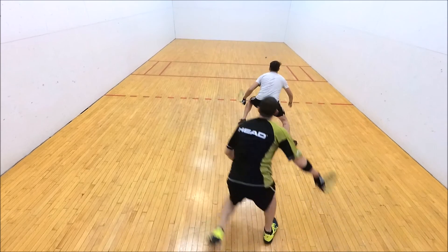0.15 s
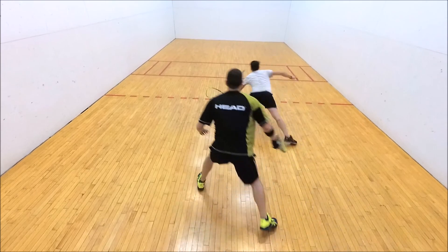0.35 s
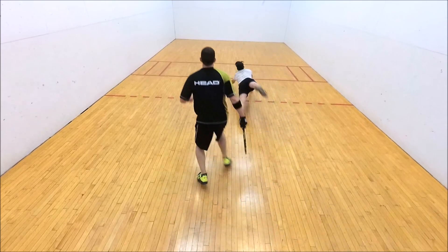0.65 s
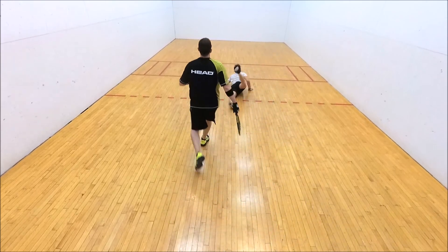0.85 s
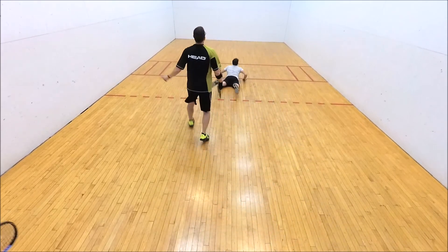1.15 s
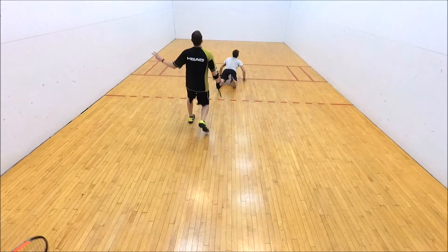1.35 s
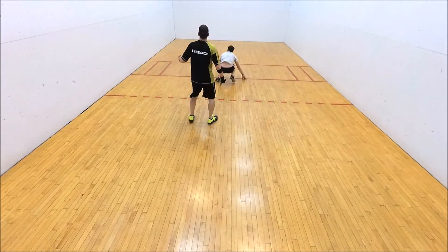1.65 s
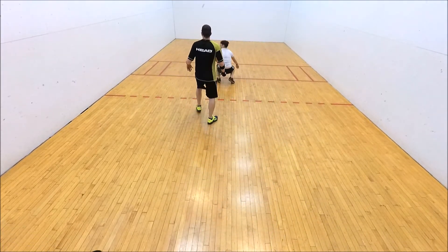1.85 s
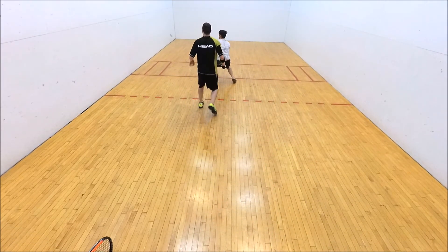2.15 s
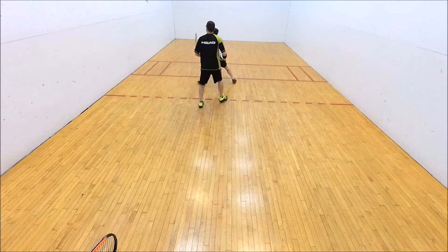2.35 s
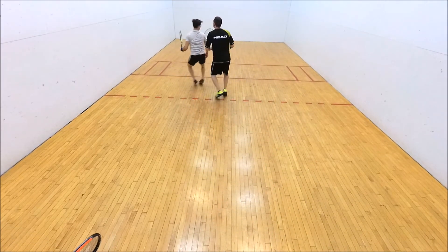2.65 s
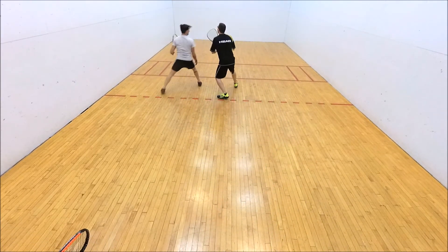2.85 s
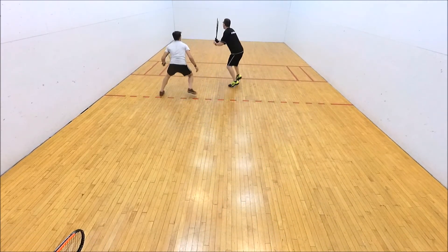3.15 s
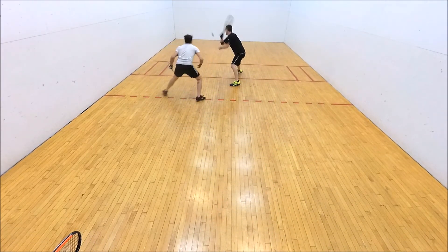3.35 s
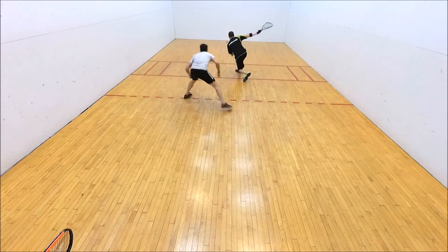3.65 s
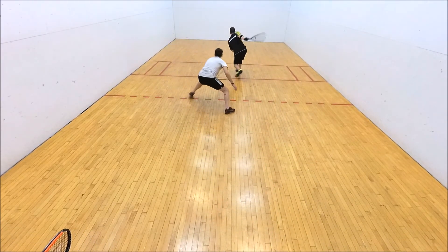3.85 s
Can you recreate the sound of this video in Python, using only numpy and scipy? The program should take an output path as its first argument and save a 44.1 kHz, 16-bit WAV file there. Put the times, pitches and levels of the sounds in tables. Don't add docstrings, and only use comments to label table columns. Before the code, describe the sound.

Racquet and ball impacts ring hollow in a bare court, loud at the start, fading through fainter bounces and footfalls, then a brief shoe squeak and another loud hit; boxy microphone, right side only.

```python
import sys
import numpy as np
from scipy import signal
from scipy.fft import rfft, irfft, next_fast_len
from scipy.io import wavfile
from scipy.ndimage import uniform_filter1d, map_coordinates

SR = 44100
rng = np.random.default_rng(int(sys.argv[2]) if len(sys.argv) > 2 else 0)


def unload_audio(sound):
    columns = np.transpose(np.atleast_2d(sound))
    steps = np.round(np.clip(columns, -1, 1) * 32767)
    wavfile.write(sys.argv[1], SR, steps.astype(np.int16))


def nominal_scale(level):
    x = np.asarray(level, float) / 20
    return 10 ** x


N = 176400


def along(points, hz):
    f, v = np.transpose(points)
    return np.interp(np.log(hz + 1), np.log(f + 1), v)


def closed(points, hz):
    below, above = (points[0][0] / 2, -120), (points[-1][0] * 2, -120)
    return nominal_scale(along([below] + points + [above], hz))


def unit(x):
    return x / np.sqrt(np.mean(x ** 2) + 1e-20)


def filtered(x, response):
    m = next_fast_len(N + SR // 2)
    return irfft(rfft(x, m) * response(np.fft.rfftfreq(m, 1 / SR)), m)[..., :N]


def peak(f, hz, width):
    return 1j * f * width / (hz * hz - f * f + 1j * f * width)


def add(out, x, s):
    k = round(s * SR)
    x = x[max(-k, 0):][:N - max(k, 0)]
    out[max(k, 0):][:len(x)] += x


# (frequency [Hz], T60 [s])
COURT_T60 = [(60, 2.3), (200, 3.7), (500, 2.75), (1500, 2.64), (4000, 2.79), (6000, 1.77), (9000, 1.06),
             (15000, 0.37)]
# (frequency [Hz], time constant [s])
COURT_RISE = [(200, .04), (900, .06), (1500, .035), (3000, .01), (8000, .012)]


def court(colour):
    echoes_per_s, uneven_db, mixed_s = 380, 7, 0.063
    early_db, early_t60_s = -7.5, 1
    t = np.arange(5 * SR // 2) / SR
    lumps = map_coordinates(rng.standard_normal(2000), [np.minimum(t * echoes_per_s, 1990)], order=1)
    echoes = rng.standard_normal(len(t)) * nominal_scale(uneven_db * lumps * np.exp(-t / mixed_s))
    hz, s, z = signal.stft(echoes, SR, nperseg=512, noverlap=384)
    late = nominal_scale(-60 * s / along(COURT_T60, hz)[:, None])
    early = nominal_scale(early_db - 60 * s / early_t60_s)
    rise = 1 - np.exp(-(s + 0.0039) / along(COURT_RISE, hz)[:, None])
    shape = colour(hz)[:, None] * rise * late * (1 + early)
    return signal.istft(z * shape, SR, nperseg=512, noverlap=384)[1][:len(t)]


# (time [s], hollow pock [dB], rubber slap [dB], bright crack [dB], slap tilt [dB per octave])
HITS = [(-.06, -5, -7.5, -21.5, 0.5), (.552, -24, -17.5, -36, 1.5), (0.671, -17, -36, -56.5, 5),
        (.76, -32, -53, -52.5, 6), (.9, -45, -70, -49, -10.5), (1.082, -64, -54, -25, 0),
        (1.33, -47, -25, -33, 1), (1.668, -89, -30, -42, 1.5), (2.134, -33.5, -37, -47, -0.5),
        (2.874, -88, -48.5, -65, -1), (3.3, -60, -44.5, -57, 0.5), (3.571, -9, -28, -34.5, 3),
        (3.588, -7, -31, -48, -4), (3.755, -19, -35.5, -34, 8.5), (3.771, -7.5, -19, -34.5, -2.5)]
# (frequency [Hz], level [dB])
POCK = [(500, -7), (760, -0.5), (900, 5), (1050, 3), (1400, -9.5)]
SLAP = [(100, 2), (250, -4), (330, 9.5), (700, 11), (2000, 6), (4000, -3), (5600, -6), (7500, -25.5)]
CRACK = [(4000, -10), (7000, -10.5), (8500, -5.5), (12000, -3.5), (15500, 3)]
# (time [s], level [dB], frequency [Hz], width [Hz])
RINGS = [(0.555, -6, 1310, 297), (.64, -24, 5000, 1000), (1.083, -24, 5440, 500), (1.322, -15, 3900, 350),
         (1.665, -35.5, 3970, 300), (1.332, -19, 5260, 590), (1.67, -26, 2190, 300),
         (2.135, -11.5, 994, 160), (2.88, -17, 650, 90), (3.478, -37, 1510, 504), (3.772, -24, 3500, 303)]


def ball():
    bass_cut_hz = 80
    out = np.zeros(N)
    for s, pock_db, slap_db, crack_db, tilt_db in HITS:
        def contact(hz):
            pock = nominal_scale(pock_db) * closed(POCK, hz)
            slap = nominal_scale(slap_db + tilt_db * np.log2((hz + 1) / 2000)) * closed(SLAP, hz)
            return pock + slap + nominal_scale(crack_db) * closed(CRACK, hz)
        add(out, court(contact), s)
    for s, db, ring_hz, width in RINGS:
        ring = court(lambda hz: nominal_scale(db) * np.abs(peak(hz, ring_hz, width)) ** 2)
        add(out, ring, s)
    return filtered(out, lambda f: (1j * f / (bass_cut_hz + 1j * f)) ** 2)


# (frequency [Hz], level [dB])
AIR = [(40, -38), (85, -16.5), (120, -6.5), (400, -10.5), (620, -4.5), (2500, -16.5), (5000, -27.5),
       (7000, -37), (15000, -29.5)]


def murmur():
    return nominal_scale(-46.5) * unit(filtered(rng.standard_normal(N), lambda f: closed(AIR, f)))


# (frequency [Hz], width [Hz], level [dB])
HOUSING = [(896.6, 68, 11), (1050, 37, 6.5), (1427, 150, 5.5), (1732, 53, 7), (2379, 167, 10),
           (2860, 80, 3.5), (3303, 200, 9), (3940, 244, 5.5), (4690, 190, 5), (5860, 1400, 1.5),
           (8700, 680, 7), (11080, 350, 8), (12700, 630, 0.5), (14400, 900, 1)]
# (frequency [Hz], width [Hz], level [dB])
NOTCHES = [(1026, 70, -8.5), (1193, 46, -10.5), (2664, 65, -9.5), (2963, 124, -7.5), (4210, 74, -4),
           (5880, 260, -5)]


def housing(x):
    leak_db = -4
    f = np.fft.rfftfreq(4096, 1 / SR)
    power = nominal_scale(2 * leak_db) + sum(nominal_scale(2 * db) * np.abs(peak(f, c, w)) ** 2 for c, w, db in HOUSING)
    dips = nominal_scale(sum(db * np.exp(-((f - c) / w) ** 2) for c, w, db in NOTCHES))
    cep = irfft(np.log(np.sqrt(power) * dips))
    cep[1:2048] *= 2
    cep[2049:] = 0
    return signal.fftconvolve(x, irfft(np.exp(rfft(cep))))[:N]


# (frequency [Hz], level [dB])
HISS = [(30, 9), (60, -36), (200, -4), (600, -4.5), (3000, -4.5), (7000, -8.5), (15000, -10)]
# (frequency [Hz], level [dB])
HUM = [(120, -91), (180, -92), (240, -86), (300, -91), (360, -90), (420, -88), (540, -87), (660, -87),
       (780, -87), (900, -89)]
# (frequency [Hz], width [Hz], level [dB])
WHINE = [(9910, 1000, -62), (13100, 400, -71)]


def circuit():
    hiss_db = (-62, -56.5)
    tick_s, tick_db, tick_t60_s = .1598, -38, .005
    t = np.arange(N) / SR
    hiss = [nominal_scale(db) * unit(filtered(rng.standard_normal(N), lambda f: closed(HISS, f))) for db in hiss_db]
    hum = sum(nominal_scale(db) * np.sin(2 * np.pi * (hz * t + rng.random())) for hz, db in HUM)
    tick = nominal_scale(tick_db - 60 * ((t - tick_s) % 1) / tick_t60_s) * rng.standard_normal(N)
    whine = np.zeros(N)
    for hz, width, db in WHINE:
        whine += nominal_scale(db) * unit(filtered(rng.standard_normal(N), lambda f: peak(f, hz, width) ** 2))
    return np.array([hiss[0] + hum + tick, hiss[1] + whine])


# (time [s], level [dB], floor note [Hz], T60 [s])
STEPS = [(.0, -19.5, 88, 0.25), (.03, -34, 55, 0.2), (.45, -54, 86, .6), (.76, -33, 165, 0.51),
         (0.788, -22.5, 87, 0.26), (0.931, -41, 93.3, 0.52), (1.08, -42, 159.6, 0.81),
         (1.21, -47, 84.3, 0.7), (1.372, -23.5, 157, 0.15), (1.76, -34, 87.6, 0.18), (1.879, -37, 95, 0.27),
         (2.15, -41.5, 176, 0.3), (2.419, -49, 88, 0.69), (2.5, -49, 157.4, 0.42), (2.864, -24, 673, 0.18),
         (2.93, -53, 92.5, 1), (3.269, -46, 89.5, 0.19), (3.302, -24.5, 668, 0.16),
         (1.328, -34.5, 289, 0.39), (2.134, -40, 230.2, 0.4), (3.78, -23, 250, 0.39), (.73, -29, 202, 0.23),
         (3.771, -27, 163.2, 0.66), (3.79, -32.5, 83.3, 0.93)]


def steps():
    rise_s, mode_ratio, mode_scatter, room_db = .04, 1.04, .8, -20
    out, t = np.zeros(N), np.arange(SR) / SR
    for (s, db, hz, t60), chance in zip(STEPS, rng.random((len(STEPS), 3))):
        modes = hz * mode_ratio ** (np.array([-1, 0, 1]) + mode_scatter * (chance - .5))
        note = np.array([.5, 1, .5]) @ np.sin(2 * np.pi * modes[:, None] * t)
        onset = (1 - np.exp(-t * np.sqrt(hz / 90) / rise_s)) ** 2
        add(out, nominal_scale(db - 60 * t / t60) * onset * note, s)
    tail = court(lambda hz: closed([(60, 0.015), (1000, 0)], hz))
    return out + nominal_scale(room_db) * signal.fftconvolve(out, tail / np.linalg.norm(tail))[:N]


# (time [s], level [dB], length [s])
SWELLS = [(0.028, 2, 0.01), (0.042, -1, 0.006), (0.124, -3.5, 0.011), (0.161, -5, .007),
          (0.214, -4.5, 0.0053), (0.233, -3.5, 0.0048), (0.259, -10, 0.0051), (0.315, -9, 0.0075),
          (.329, -11, .006), (0.357, -9.5, 0.0047), (0.449, -12, 0.0066), (0.474, -9.5, 0.004),
          (0.484, -14, 0.005), (.588, -6.5, 0.0034), (0.636, -9, 0.0044), (0.736, -11, 0.0036),
          (0.755, -14.5, 0.01), (.78, -9, 0.0074), (0.882, -16, 0.0087), (0.979, -18.5, .007),
          (1.108, -21, 0.01), (1.239, -24, 0.016), (1.354, -21, .007), (1.41, -20.5, 0.0056),
          (1.436, -27, 0.017), (1.743, -23, 0.0077), (2.17, -26, 0.0043), (2.191, -21, 0.0033),
          (2.204, -16, 0.0064), (2.231, -23, 0.0045), (2.249, -20.5, 0.0055), (2.278, -26, 0.0055),
          (2.303, -22, 0.0061), (2.309, -21.5, 0.0068), (2.343, -25, 0.0096), (2.378, -25, 0.01),
          (2.406, -24, 0.0033), (2.455, -26, 0.0095), (2.508, -30.5, .009), (2.555, -27.5, 0.0091),
          (2.696, -32.5, 0.0084), (2.813, -34, 0.0093), (3.617, -5.5, 0.0063), (3.635, -4.5, 0.0049),
          (3.645, -2, 0.0076), (3.682, -9, 0.0044), (3.72, -9.5, 0.0066), (3.808, -3, 0.01),
          (3.825, -1.5, 0.0076), (3.844, 1.5, 0.0018), (3.857, -4, 0.0073), (3.87, -1, 0.0027),
          (3.893, -4, 0.0023), (3.916, -9.5, 0.0091), (3.944, -10, 0.0077), (3.981, -6.5, 0.0069)]


def swells(wash):
    main_hz, scatter, band_hz = 914.2, 0.023, 97
    reach = 0.79
    tones, share, t = np.zeros(N), np.zeros(N), np.arange(-2000, 2000) / SR
    for (s, db, length), (turn, detune) in zip(SWELLS, rng.random((len(SWELLS), 2))):
        hz = main_hz * (1 + scatter * (2 * detune - 1))
        tone = np.sin(2 * np.pi * (hz * t + turn))
        add(tones, nominal_scale(db) * np.exp(-(t / length) ** 2) * tone, s + t[0])
        add(share, np.exp(-(t / length / reach) ** 2), s + t[0])
    note = filtered(wash, lambda f: np.exp(-((f - main_hz) / band_hz) ** 2))
    return wash - np.minimum(share, 1) * note + tones


# (time [s], slap [dB], crack [dB], length [s])
CLAPS = [(0.564, -35, -46, 0.0038), (0.594, -37, -48, 0.0022), (0.67, -18, -51, 0.0036),
         (0.709, -21, -59, .012), (1.087, -38, -17, 0.002), (1.107, -29, -16, 0.002),
         (1.15, -32.5, -27, .004), (1.336, -23, -49, 0.0031), (1.351, -49.5, -36, 0.00087),
         (1.367, -29, -43, 0.0015), (1.698, -44.5, -38, 0.0023), (3.855, -21.5, -34.5, 0.0035),
         (3.886, -19, -47, 0.0034), (2.137, -47, -56, 0.0044), (3.779, -13, -31, 0.0033),
         (3.787, -14.5, -48, 0.0019), (0.052, -14, -43, 0.0034), (0.123, -13, -50, 0.0047)]


def wall_claps():
    claps, t = np.zeros((2, N)), np.arange(-2000, 2000) / SR
    for s, slap_db, crack_db, length in CLAPS:
        burst = np.exp(-(t / length) ** 2) * rng.standard_normal(len(t))
        add(claps[0], nominal_scale(slap_db) * burst, s + t[0])
        add(claps[1], nominal_scale(crack_db) * burst, s + t[0])
    coloured = filtered(claps, lambda f: np.array([closed(SLAP, f) * f / 2000, closed(CRACK, f)]))
    return housing(coloured.sum(axis=0))


# (time [s], frequency [Hz], level [dB])
SQUEAK = [(3.126, 6250, -58), (3.133, 6150, -39), (3.14, 6150, -47), (3.146, 6200, -35), (3.156, 5850, -33),
          (3.161, 5750, -35), (3.165, 6300, -36), (3.172, 6400, -38), (3.18, 6100, -52)]


def squeak():
    roughness, overtone_db, room_db, level_db = .032, -8.5, -1, 2
    s, hz, db = np.transpose(SQUEAK)
    t = np.arange(s[0], s[-1], 1 / SR)
    jitter = 1 + roughness * unit(uniform_filter1d(rng.standard_normal(len(t)), size=30))
    phase = 2 * np.pi * np.cumsum(np.interp(t, s, hz) * jitter) / SR
    direct = nominal_scale(np.interp(t, s, db)) * (np.sin(phase) + nominal_scale(overtone_db) * np.sin(2 * phase))
    tail, out = court(np.ones_like), np.zeros(N)
    add(out, direct, s[0])
    add(out, nominal_scale(room_db) * signal.fftconvolve(direct, tail / np.linalg.norm(tail)), s[0] + 0.002)
    return nominal_scale(level_db) * out


def treble_gaps(x):
    from_hz, gap_db = 4000, -22
    base_share, share_per_db, faint_under_db = (.07, .02), .035, 36
    hz, _, z = signal.stft(x, SR, nperseg=1536)
    level_db = 10 * np.log10(uniform_filter1d(np.abs(z) ** 2, size=9, axis=1) + 1e-16)
    under_db = level_db.max(axis=1, keepdims=True) - level_db
    under_db = uniform_filter1d(under_db, size=5, axis=2)
    share = np.reshape(base_share, (2, 1, 1)) + np.clip(share_per_db * (under_db - faint_under_db), 0, .4)
    chance = rng.random(z.shape)[:, np.arange(len(hz)) // 7][..., np.arange(z.shape[2]) // 2]
    gaps = (chance < share) & (hz[:, None] > from_hz)
    return signal.istft(z * nominal_scale(gap_db * gaps), SR, nperseg=1536)[1][:, :N]


def scene():
    wash = housing(ball() + murmur())
    right = swells(wash) + steps() + squeak() + wall_claps()
    return np.array([np.zeros(N), right])


def band_limit(x):
    return signal.sosfilt(signal.butter(12, 15670, fs=SR, output="sos"), x)


def record(dry):
    ceiling, hardness = 1, 24
    top_hz, edge_hz, above_db = 15250, 150, -18
    x = dry / (1 + np.abs(dry / ceiling) ** hardness) ** (1 / hardness) + circuit()
    x = filtered(x, lambda hz: nominal_scale(above_db * np.clip((hz - top_hz) / edge_hz, 0, 1)))
    mix = treble_gaps(x)
    return band_limit(mix)


dry = scene()
out = record(dry)
unload_audio(out)
```